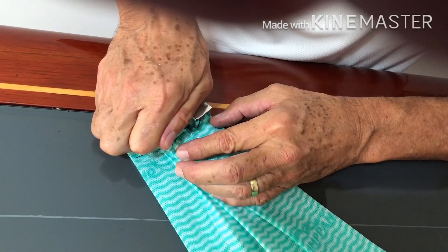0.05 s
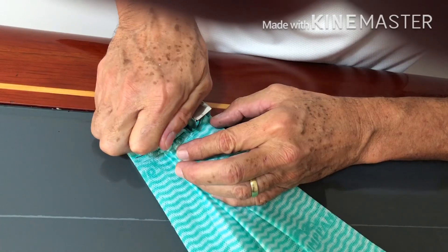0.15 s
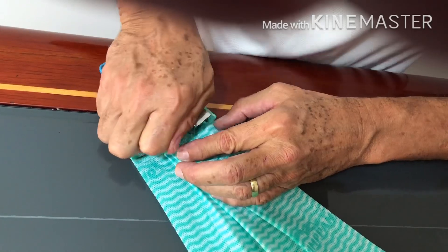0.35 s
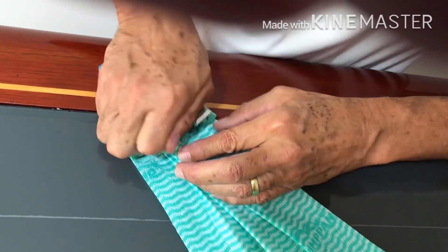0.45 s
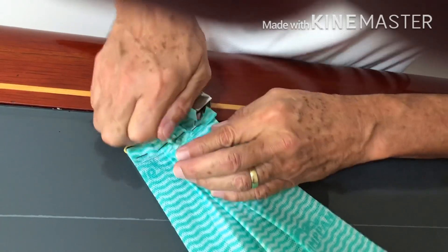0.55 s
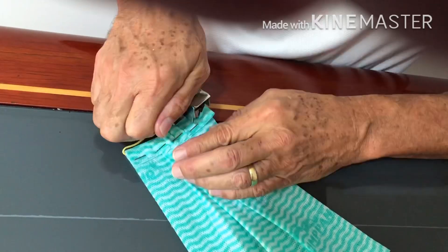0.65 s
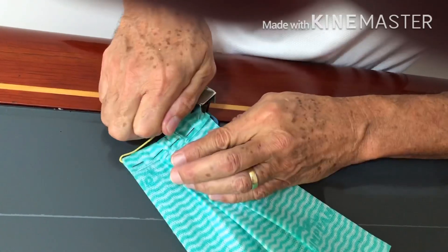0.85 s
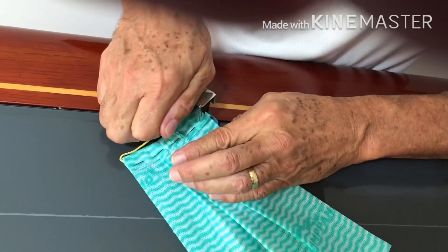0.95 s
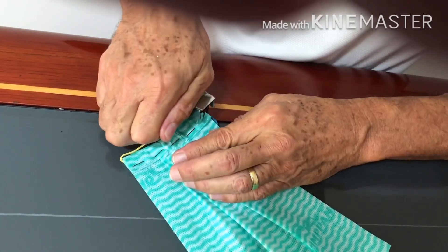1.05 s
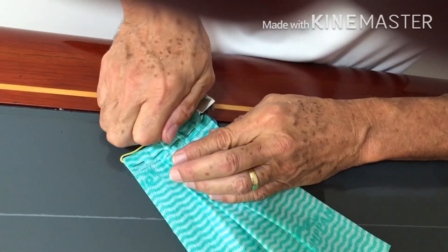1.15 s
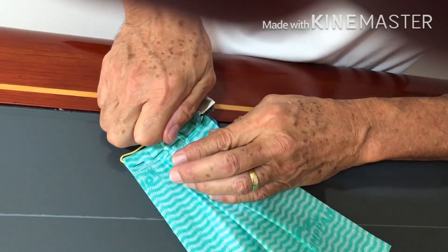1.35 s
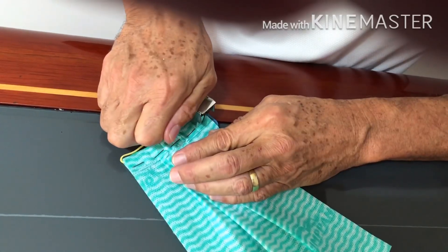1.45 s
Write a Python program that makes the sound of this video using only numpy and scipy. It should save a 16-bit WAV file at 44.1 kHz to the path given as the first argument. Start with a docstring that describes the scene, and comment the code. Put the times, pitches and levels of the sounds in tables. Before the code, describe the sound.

A stapler clacks sharply through cloth on a table, then springs open with a lighter click.

```python
"""A table in a fairly live room, the microphone close to a small steel stapler pressed through cloth.
It ticks as the hand loads it, then clacks: a quick run of metal contacts rasps, rings the steel and
thumps the table while the staple zings. The base rebounds and the arm springs open with a lighter click.
Hands rub faintly on the cloth, and the room rings on over a low hum and quiet air."""
import sys
import numpy as np
from scipy import signal
from scipy.fft import rfft, irfft
from scipy.io import wavfile

SR = 44100
rng = np.random.default_rng(int(sys.argv[2]) if len(sys.argv) > 2 else 0)


def output_pcm(signal):
    """Save a mono or channel-first signal as 16-bit PCM at the path in sys.argv[1].

    Samples are clipped to [-1, 1] before scaling.
    """
    pcm = np.clip(np.atleast_2d(signal).T, -1, 1) * 32767
    wavfile.write(sys.argv[1], SR, np.round(pcm).astype(np.int16))


N = 66150

# Room air. Each row: frequency in Hz, relative level in dB per Hz.
AIR_SPECTRUM = [(20, -36.5), (35, -15.5), (55, -0.5), (120, -3), (220, -2.5), (370, -7.5), (600, -12),
                (1100, -17.5), (2000, -20), (4000, -30), (8000, -33.5), (15500, -39.5)]
# Mains hum. Each row: frequency in Hz, level in dB.
HUM_PARTIALS = [(59.2, -78), (118.6, -62.5), (247, -69.5), (345, -70.5)]

# Metal contacts. Each row: start in seconds, strength in dB, tilt in dB per octave, roll-off in Hz.
GRIP_CONTACTS = [(.1408, -23.5, 5.5, 15600), (.1428, -17.5, -6, 1786), (.1853, -18, 4, 3800),
                 (.2078, -29.5, -11.5, 2500), (.2112, -25.5, -8.5, 3500)]
STROKE_CONTACTS = [(.2313, -12, 6, 16000), (.2324, -0.5, 5.5, 16000), (.2338, -3, -3.5, 16000),
                   (.2349, 6, 0, 14000), (.2381, -11, -4, 16000), (.2413, -6, -0.5, 16000),
                   (.2438, -14, 2, 16000), (.2453, -7, -6.5, 2400)]
REBOUND_CONTACTS = [(.2670, -2, 0, 4567)]
RELEASE_CONTACTS = [(.4738, -10, 5.5, 10000), (.4760, 5, 4, 14000), (.4776, 5, 0, 14000),
                    (.4806, -11, 10, 4500)]
# Modes of the struck parts. Each row: frequency in Hz, relative level in dB, t60 in seconds.
LOOSE_STAPLER_MODES = [(1130, -16, 0.011), (2365, -17.5, .013), (3300, -19, .012), (4600, -27, .01),
                       (7350, -30, .009)]
TABLE_MODES = [(58, -36, 0.34), (109, -31, 0.37), (132.6, -29, 0.45), (151.7, -21.5, .25),
               (194.2, -26, 0.75), (214.3, -14, 0.083), (256.74, -25, .5), (291, -11.5, 0.044),
               (381, -36.5, .3)]
CLOSED_BODY_MODES = [(800, -32, 0.017), (1062, -27.5, 0.085), (1144, -23, .04), (1211, -26, .06),
                     (1499, -24, 0.054), (1730, -29.5, .025), (2209, -17.5, .025), (2600, -27.5, .02),
                     (3250, -27.5, .015), (4032, -33.5, 0.035), (4520, -19.5, 0.021), (7150, -18, .008),
                     (9500, -30.5, 0.0092), (11220, -30, 0.022)]
BASE_MODES = [(1120, -28.5, 0.024), (1707, -12, 0.016), (2230, -19.5, 0.017), (3322, -30.5, 0.02)]
ARM_MODES = [(1097, -35, 0.024), (1206, -20.5, 0.018), (1387, -23, 0.017), (1610, -30, 0.005),
             (2328, -37, 0.061), (2746, -30.5, 0.037), (3194, -38.5, 0.049), (4370, -28, 0.011),
             (6460, -20, 0.0037), (8370, -32, 0.01567), (9400, -40.5, 0.023)]
# Rasp of steel on steel. Each row: frequency in Hz, relative level in dB per Hz, t60 in seconds.
LIGHT_RASP = [(100, -28.5, .03), (503, -19, .03), (1511.6, -14.5, 0.02), (3500, -15.5, 0.042),
              (6000, -20, 0.022), (9500, -30.5, 0.017), (15270, -28.5, 0.018)]
STROKE_RASP = [(100, -25, .03), (450, -16.5, 0.029), (850, -5.5, .035), (1800, -6, 0.045),
               (3400, -9.5, 0.047), (5500, -14.5, 0.021), (6900, -15.5, 0.059), (8060, -20, 0.031),
               (11400, -21.5, .024), (15500, -19, 0.008)]
ARM_RASP = [(99.3, -60, .02), (433, -22, 0.045), (800, -10.5, 0.0057), (1220, -13.5, 0.032),
            (3100, -12, 0.0077), (6170, -20, 0.011), (9100, -22, 0.0092), (15500, -32.5, 0.023)]
# Pushes on the table. Each row: start in seconds, strength in dB.
TABLE_PUSHES = [(0.141, -27), (.206, -31.5), (.2335, 4), (.477, -29)]

# Reflections, near and far. Each row: frequency in Hz, energy in dB, t60 in seconds.
NEAR_SURFACES = [(99.7, -21, .1), (1200, -16.5, 0.24), (5000, -13.5, 0.15), (15500, -9.5, 0.16)]
ROOM_REVERB = [(60, 0.5, 0.89), (200, -11.5, 1), (447, 7, 0.65), (810, -1, 0.52), (1200, -8, 0.72),
               (1920, -3.5, 0.76), (2500, -4.5, 0.66), (3440, -9.5, .76), (4400, -13.5, .76),
               (7000, -10.5, 0.51), (9500, -9, 0.44), (12500, -14, .48), (15500, -13, .42)]
# Hands on cloth and table. Each row: middle in seconds, half length in seconds, level in dB,
# centre in Hz, half width in octaves.
HAND_RUBS = [(.185, .03, -58, 90, .2), (0.24, 0.036, -53, 2650, 0.44), (0.572, 0.1, -49.5, 81.1, 0.202),
             (0.865, 0.0016, -59, 4530, 0.21), (.918, 0.0089, -63, 1040, 0.17),
             (0.94, 0.099, -76.5, 5400, 0.42), (1.117, 0.031, -66.5, 1100, 0.16),
             (1.119, 0.03, -71.5, 2600, 0.35), (1.102, 0.072, -78, 4900, 0.055)]

LN_1000 = np.log(1000)  # a fall of 60 dB


def amp(db):
    """Decibels to gain."""
    return 10 ** (np.asarray(db) / 20)


def read(rows, hz, column=1):
    """One column of a table, joined by straight lines over log frequency."""
    rows = np.array(rows, float)
    return np.interp(np.log(hz + 1), np.log(rows[:, 0] + 1), rows[:, column])


def add(mix, start_s, sound):
    """Places a sound in the mix at a time."""
    part = mix[round(start_s * SR):][:len(sound)]
    part += sound[:len(part)]


def ring(modes, t):
    """A struck part rings as decaying sines of alternating sign."""
    return sum((-1) ** k * amp(db) * np.exp(-LN_1000 * t / t60) * np.sin(2 * np.pi * hz * t)
               for k, (hz, db, t60) in enumerate(modes))


def dying_noise(bands, t):
    """White noise in overlapping bands, each with its own level and decay."""
    hz = np.fft.rfftfreq(len(t), 1 / SR)
    white = np.exp(2j * np.pi * rng.random(len(hz))) * np.sqrt(len(t))
    centres = np.geomspace(40, 16000, 28)
    out = np.zeros(len(t))
    for centre, share in zip(centres, np.eye(len(centres))):
        band = irfft(white * np.interp(hz, centres, share) * amp(read(bands, hz)), len(t))
        out += band * np.exp(-LN_1000 * t / read(bands, centre, column=2))
    return out


def even_rasp(bands, t):
    """A burst of dying noise with a smooth spectrum, so that it has no pitch of its own."""
    hz = np.fft.rfftfreq(len(t), 1 / SR)
    level = amp(read(bands, hz)) * np.sqrt(read(bands, hz, column=2) * SR / (2 * LN_1000))
    phase = np.angle(rfft(dying_noise(bands, t)))
    return irfft(level * np.exp(1j * phase), len(t)) * (1 - t / t[-1]) ** 2


def brighten(x, tilt_db, corner_hz, pivot_hz=2500):
    """Tilts the spectrum and rolls off the top, without smearing the attack backwards."""
    hz = np.clip(abs(np.fft.fftfreq(len(x), 1 / SR)), 800, 16000)
    gain = amp(tilt_db * np.log2(hz / pivot_hz)) / np.hypot(1, (hz / corner_hz) ** 2)
    minimum_phase = np.exp(np.conj(signal.hilbert(np.log(gain))))
    return np.fft.ifft(np.fft.fft(x) * minimum_phase).real


def contacts(rows, modes, rasp, directions=4, rise_s=0.0003):
    """Each contact rasps and rings the steel; successive ones radiate in different directions."""
    out, t = np.zeros((directions, N)), np.arange(4096) / SR
    for k, (start_s, db, tilt_db, corner_hz) in enumerate(rows):
        click = (ring(modes, t) + even_rasp(rasp, t)) * (1 - np.exp(-t / rise_s))
        add(out[k % directions], start_s, amp(db) * brighten(click, tilt_db, corner_hz))
    return out


def room_tone(air_db=-61):
    """Steady air all round the microphone, with a faint mains hum."""
    t, hz = np.arange(N) / SR, np.fft.rfftfreq(N, 1 / SR)
    air = irfft(rfft(rng.standard_normal(N)) * amp(read(AIR_SPECTRUM, hz)), N)
    hum = sum(amp(db) * np.sin(2 * np.pi * (f * t + rng.random())) for f, db in HUM_PARTIALS)
    return amp(air_db) * air / air.std() + hum


def grip_ticks():
    """The loosely held stapler ticks as the grip tightens."""
    return contacts(GRIP_CONTACTS, LOOSE_STAPLER_MODES, LIGHT_RASP)


def table_boom(rise_s=0.0046):
    """The table top booms under each push."""
    out, t = np.zeros(N), np.arange(N) / SR
    boom = ring(TABLE_MODES, t) * (1 - np.exp(-(t / rise_s) ** 2))
    for start_s, db in TABLE_PUSHES:
        add(out, start_s, amp(db) * boom)
    return out


def reflections(bands, delay_s, rise_s, samples):
    """A diffuse tail that swells just after the direct sound reaches the microphone."""
    t = np.arange(samples) / SR
    # Spread each band's energy over its decay to get its starting level.
    starts = [(hz, db + 10 * np.log10(2 * LN_1000 / (t60 * SR)), t60) for hz, db, t60 in bands]
    swell = 1 - np.exp(-np.maximum(t - delay_s, 0) / rise_s)
    return dying_noise(starts, t) * swell


def room(x):
    """The long ring of the room and short reflections off nearby surfaces, for one direction."""
    tail = reflections(ROOM_REVERB, delay_s=0.008, rise_s=0.0029, samples=40960)
    add(tail, 0, reflections(NEAR_SURFACES, delay_s=0.024, rise_s=0.00087, samples=8192))
    return signal.fftconvolve(x, tail)[:N]


def hand_rubs():
    """Faint swells of friction noise as the hands shift on cloth and table."""
    t, hz, out = np.arange(N) / SR, np.fft.rfftfreq(N, 1 / SR), np.zeros(N)
    for middle_s, half_s, db, centre_hz, octaves in HAND_RUBS:
        band = 1 / (1 + (np.log2((hz + 1) / centre_hz) / octaves) ** 2)
        hiss = irfft(rfft(rng.standard_normal(N)) * band, N)
        swell = np.exp(-((t - middle_s) / half_s) ** 2)
        out += amp(db) * hiss / hiss.std() * swell
    return out


def stroke_clack():
    """The driving stroke rings the closed steel body; the base knocks once as it rebounds."""
    stroke = contacts(STROKE_CONTACTS, CLOSED_BODY_MODES, STROKE_RASP)
    return stroke + contacts(REBOUND_CONTACTS, BASE_MODES, LIGHT_RASP)


def staple_zing(start_s=0.2323, start_hz=6724, hz_per_s=200000, db=-3.5, rise_s=0.0008, t60_s=0.016):
    """One short partial that glides upward as the staple bends."""
    t = np.maximum(np.arange(N) / SR - start_s, 0)
    envelope = (1 - np.exp(-t / rise_s)) * np.exp(-LN_1000 * t / t60_s)
    cycles = start_hz * t + hz_per_s * t ** 2 / 2
    return amp(db) * envelope * np.sin(2 * np.pi * cycles)


def arm_release():
    """The freed arm snaps back, and it and its spring ring briefly."""
    return contacts(RELEASE_CONTACTS, ARM_MODES, ARM_RASP)


def scene():
    """Stapler and table close to one microphone; each direction takes its own way round the room."""
    clack, release, ticks = stroke_clack(), arm_release(), grip_ticks()
    boom, zing = table_boom(), staple_zing()
    direct = (clack + release + ticks).sum(0) + boom + zing + hand_rubs()
    # How much of each sound goes out into the room, in dB against the clack.
    radiated = clack + amp(0.5) * release + amp(1.5) * ticks
    radiated[0] += amp(-2.5) * boom + amp(-6) * zing
    reverb = sum(room(direction) for direction in radiated)
    return (direct + reverb + room_tone())[None]


def record(dry, low_cut_hz=14, top_hz=15800):
    """The microphone sheds the deepest bass, peaks clip at full scale, then the top treble is cut."""
    heard = signal.sosfilt(signal.butter(2, low_cut_hz, "high", fs=SR, output="sos"), dry)
    lowpass = signal.firwin(301, top_hz, window=("kaiser", 9), fs=SR)
    return signal.oaconvolve(np.clip(heard, -1, 1), lowpass[None], "same")


dry = scene()
out = record(dry)
output_pcm(out)
```